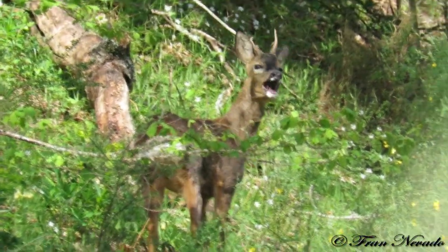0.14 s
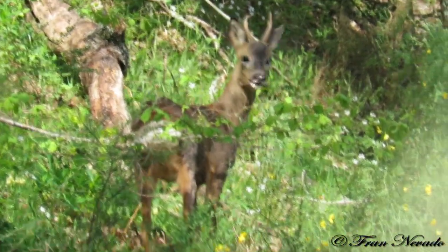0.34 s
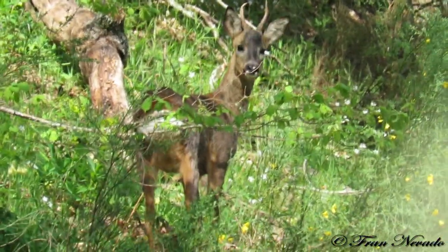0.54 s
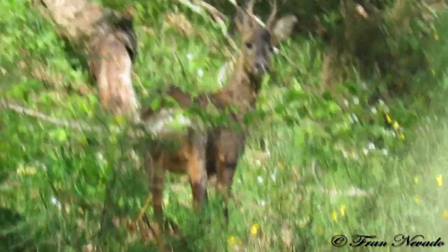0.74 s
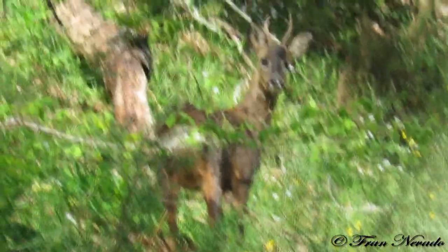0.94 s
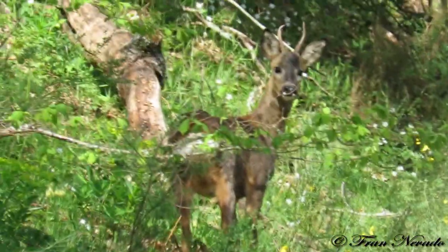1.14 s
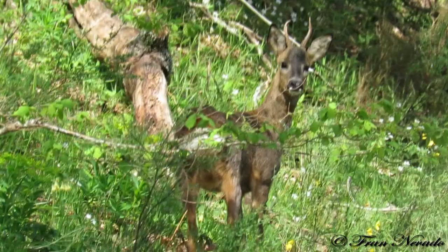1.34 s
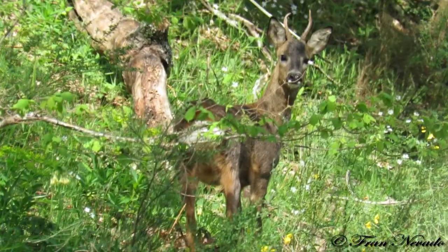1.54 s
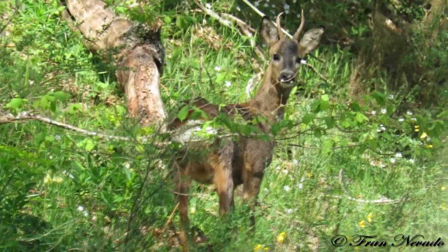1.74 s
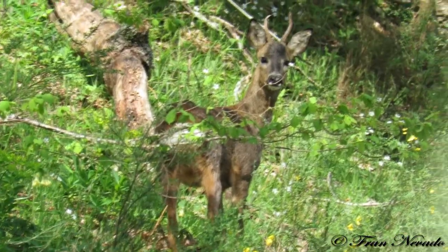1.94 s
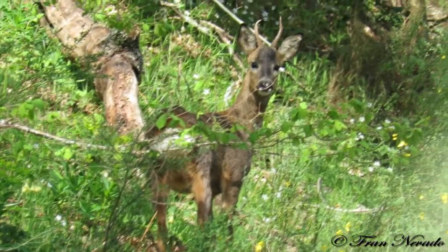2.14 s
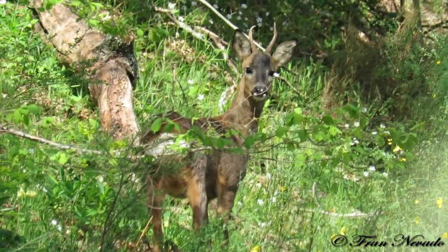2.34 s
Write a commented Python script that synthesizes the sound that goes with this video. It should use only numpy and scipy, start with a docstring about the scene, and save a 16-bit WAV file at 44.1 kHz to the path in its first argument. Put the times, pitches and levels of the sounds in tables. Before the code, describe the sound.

A small deer gives one harsh, hoarse bark in woodland, then faint birds whistle and buzz.

```python
"""Woodland: a small deer barks once, trees scatter the bark, and far birds whistle and buzz.
The bark is a source and filter: chaotic fold pulses and breath noise ring a throat that slowly lengthens.
Bird notes are gliding sines, some shaken in pitch; dry ticks are short bursts of treble noise.
Behind them lies a steady distant roar, maybe traffic or a stream, with faint microphone hiss in the treble:
both are one shaped noise, alike in the two channels at low pitch and unlike in the treble."""
import sys
import numpy as np
from scipy import signal
from scipy.fft import rfft, irfft, next_fast_len
from scipy.io import wavfile
from scipy.ndimage import uniform_filter1d, map_coordinates

SR = 44100
rng = np.random.default_rng(int(sys.argv[2]) if len(sys.argv) > 2 else 0)


def persist_wave(psi):
    """Save psi, clipped to +-1, as 16-bit WAV."""
    counts = np.round(np.clip(psi, -1, 1) * 32767).astype(np.int16)
    wavfile.write(sys.argv[1], SR, np.atleast_2d(counts).T)


N = 105840

SINK_START_S, SINK_END_S = 0.16, 0.51  # the throat lengthens between these times
FOLD_HZ, JITTER_CYCLES, PULSE_SCATTER_DB = 330, .4, 2.2  # mean pulse rate, spread of timing and of size
BREATH_SHARE = .5  # noise share of the source power
FIRM_SHARE = .65  # power share of a resonance heard as a tone at first; none once the throat has sunk
FIRM_SHAKE_HZ, FIRM_SHAKE_DB = 20, 2  # unsteadiness of those tones
RASP_DB = -21  # under the upper resonances
STEADY, STEADY_S = 0.62, 0.012  # how far the ringing is evened out (0 to 1), and over what time
BARK_ECHO_DB, BIRD_ECHO_DB = -12, -6
ECHO_CROSSFEED = 0.47  # amplitude of the other channel's echo added to each
BUZZ_HZ, SWELL, EDGE = 110, .27, .18  # rate of the buzz; shares of a note spent fading in and out
RISE_BEND, FALL_BEND = 1.7, 1.5  # powers that round a glide into and out of its turn
OFF_TURN_DB = 16  # a note is quieter away from its turn pitch, dB per octave
TICK_T60_S, TICK_HZ = .006, 6500  # decay time, high-pass corner
TOP_HZ = 14300  # band limit of the whole sound


def bark():
    """Source-filter voice: uneven fold pulses and breath noise excite the resonances of the throat."""
    # levels of the throat resonances and of the broad sound between them
    # columns: time_s, first_db, second_db, upper_db, broad_db
    levels = [(0.075, -35, -45, -54.5, -48.5), (0.091, -33, -45.5, -54, -39.5),
              (0.095, -25, -38, -57, -31.5), (0.101, -26.5, -35.5, -40, -36.5),
              (0.115, -26.5, -27.5, -29, -21), (0.137, -21, -16.5, -29, -26),
              (0.157, -19.5, -17.5, -21, -23), (0.203, -15.5, -16.5, -21, -28.5),
              (0.227, -29, -18.5, -25.5, -22.5), (0.255, -12, -20.5, -23, -20),
              (0.283, -22, -28.5, -23.5, -31.5), (0.301, -15, -15, -27, -26.5),
              (0.329, -16.5, -27.5, -30, -22.5), (0.347, -18.5, -14.5, -25, -37.5),
              (0.373, -13.5, -21, -28, -30.5), (0.401, -22, -21, -34, -22.5), (0.445, -22, -33, -36, -26),
              (0.478, -26.5, -39.5, -37.5, -29), (0.495, -33.5, -31, -48, -30.5),
              (0.535, -40, -41, -65, -38), (0.56, -38.5, -37, -52, -40)]
    # resonances, with levels relative within each table
    # columns: start_hz, end_hz, width_hz, level_db
    first_modes = [(746.7, 680.5, 53, 12.5), (640, 570, 150, -3)]
    second_modes = [(1289, 1280, 94, 5.5), (1133, 1200, 30, 2), (1412, 1400, 57, -7)]  # same columns
    upper_modes = [(1910, 1895, 120, 0), (2100, 2080, 150, -3), (2350, 2350, 150, -8),
                   (2520, 2590, 180, -6), (2780, 2770, 140, -6), (2930, 2900, 110, -7),
                   (3150, 3100, 220, -19)]  # same columns
    # firm tones within the first and second resonances; columns: time_s, first_hz, second_hz
    firm_pitches = [(.1, 700, 1290), (.14, 748, 1280), (.2, 765, 1305), (.26, 730, 1245), (.3, 725, 1335),
                    (.355, 705, 1260), (.47, 668, 1330)]
    # low voiced tone beneath the bark, gliding down from about 300 to 250 Hz
    # columns: time_s, pitch_hz, level_db
    low_tone = [(.1, 296, -40.5), (.22, 314.8, -41.5), (.35, 284.4, -40.5), (.47, 250.3, -47.5)]
    # relative spectrum of the broad sound; columns: frequency_hz, level_db
    broad_spectrum = [(150, -26.5), (290, -3), (420, -3), (600, -0.5), (930, 13), (1150, 6.5), (1600, 5),
                      (2600, -10), (3300, -43), (4500, -24.5), (8000, -88)]
    # relative spectrum of the rasp; columns: frequency_hz, level_db (per Hz)
    rasp_spectrum = [(2800, -37.5), (3300, 4.5), (3800, 3), (4200, -15), (4570, 1.5), (5000, -13),
                     (6000, -12), (7000, -11), (8000, -18.5), (9000, -26.5), (10500, -18.5), (12000, -33.5),
                     (13000, -26), (14200, -38)]

    count = int(N / SR * FOLD_HZ)
    at = (np.arange(count) + JITTER_CYCLES * rng.standard_normal(count)) * SR / FOLD_HZ
    sizes = amp(PULSE_SCATTER_DB * rng.standard_normal(count))
    pulses = np.bincount(np.clip(at, 0, N - 1).astype(int), sizes, N)
    folds = unit(pulses - pulses.mean())
    breath = rng.standard_normal(N)
    source = np.sqrt(1 - BREATH_SHARE) * folds + np.sqrt(BREATH_SHARE) * breath

    broad = unit(filtered(source, lambda f: amp(along(broad_spectrum, f))))
    rough = rng.standard_normal(N) + 0.67 * source
    rasp = amp(RASP_DB) * unit(filtered(rough, lambda f: amp(along(rasp_spectrum, f))))
    upper = throat(source, upper_modes) + rasp
    pitch_hz, low_db = curves(low_tone)
    low = amp(low_db) * tone(pitch_hz, shake_hz=6, shake_db=1.0)

    t = np.arange(N) / SR
    tonal = FIRM_SHARE * np.interp(t, [SINK_START_S, SINK_END_S], [1, 0])
    first, second = [np.sqrt(tonal) * tone(hz, FIRM_SHAKE_HZ, FIRM_SHAKE_DB)
                     + np.sqrt(1 - tonal) * throat(source, modes)
                     for hz, modes in zip(curves(firm_pitches), (first_modes, second_modes))]

    first_gain, second_gain, upper_gain, broad_gain = amp(curves(levels))
    begin, end = levels[0][0], levels[-1][0]
    on = np.interp(t, [begin - .02, begin, end, end + 0.095], [0, 1, 1, 0])
    voice = low + first_gain * first + second_gain * second
    return on * (voice + broad_gain * broad + upper_gain * upper)


def throat(source, modes, count=5):
    """Resonance of a lengthening tube: band-pass modes slide in pitch, their ringing partly evened out."""
    def ring(u):
        """Sum of resonators, alternating in sign, at share u of the slide."""
        def response(f):
            total = 0
            for k, (start_hz, end_hz, width_hz, db) in enumerate(sorted(modes)):
                centre_hz = start_hz + (end_hz - start_hz) * u
                resonator = 1j * f * width_hz / (centre_hz ** 2 - f * f + 1j * f * width_hz)
                total = total + (-1) ** k * amp(db) * resonator ** 2
            return total
        return filtered(source, response)

    # crossfade between fixed positions of the throat
    sink = np.interp(np.arange(N) / SR, [SINK_START_S, SINK_END_S], [0, count - 1])
    x = unit(sum(np.sqrt(np.clip(1 - abs(sink - k), 0, 1)) * ring(k / (count - 1)) for k in range(count)))
    power = abs(uniform_filter1d(x * x, int(STEADY_S * SR))) + 0.033
    return unit(x / power ** (STEADY / 2))


def tone(hz, shake_hz, shake_db):
    """Frequency and amplitude modulation: a sine of rms 1 that wanders at random in pitch and level."""
    phase = 2 * np.pi * np.cumsum(hz + shake_hz * wobble(120.25)) / SR
    return unit(amp(shake_db * wobble(90)) * np.sin(phase))


def trees(x):
    """Multiple scattering: a diffuse echo, unlike in the two channels, that decays by frequency."""
    # decay of the scattered sound; columns: frequency_hz, t60_s
    decay = [(500, 0.22), (2000, 0.35), (5000, 0.5), (7000, 0.54), (10000, 0.12)]
    hz, t, z = signal.stft(rng.standard_normal((2, SR)), SR, nperseg=256)
    tail = signal.istft(z * amp(-60 * t / along(decay, hz)[:, None]), SR, nperseg=256)[1]
    tail = tail + ECHO_CROSSFEED * tail[::-1]
    delayed = np.pad(x, (400, 0))  # samples before the first echo
    return signal.fftconvolve(delayed[None], tail / np.linalg.norm(tail[0]), axes=1)[:, :N]


def birds():
    """Frequency modulation: each note is a sine that glides to a turn and on; buzzy notes shake in pitch."""
    # bird notes; turn_share is the place of the turn as a share of the length, pan_db left over right
    # columns: start_s, length_s, start_hz, turn_hz, end_hz, turn_share, level_db, buzz_depth_hz, pan_db
    notes = [(0.01, 0.027, 6000, 5640, 4770, 0.27, -55, 1, 4),
             (0.028, 0.023, 7800, 7100, 6430, 0.63, -62, 1, -8),
             (0.085, .03, 6020, 5040, 4600, .5, -56.5, 0.74, 4),
             (0.46, 0.022, 5950, 5600, 5200, 0.35, -58, 1, 9),
             (0.599, .175, 2450, 3286, 2760, 0.33, -49.5, 1, 0.5),
             (0.741, .05, 3265, 3230, 3280, 0.55, -59, 1, 0),
             (0.6, 0.0194, 7700, 7230, 6700, 0.56, -66, 0.9, 5),
             (0.713, 0.059, 7100, 7140, 7260, 0.48, -68.5, 100, -4),
             (0.827, 0.049, 8700, 8800, 8550, 0.41, -69, 180, 14),
             (0.826, 0.1, 7000, 5130, 5060, 0.5, -57, 1, 6),
             (0.844, 0.037, 6900, 6720, 7170, 0.55, -65, 110, 3),
             (0.931, 0.015, 4370, 4270, 4060, .5, -58, 1, 5),
             (1.005, 0.06, 6900, 7100, 6850, 0.4, -63, 130, 2),
             (1.102, .06, 5070, 4790, 4520, 0.39, -56.5, 0.75, 7),
             (1.118, 0.165, 2450, 3284, 2750, 0.36, -48.5, 1, -2),
             (1.479, 0.115, 2480, 3160, 3060, 0.7, -46.5, 110, 3.5),
             (1.613, 0.078, 7350, 7030, 6500, 0.58, -55.5, 180, 5),
             (1.396, 0.078, 4700, 4730, 4600, 0.41, -65.5, 60, 4),
             (1.886, 0.023, 4050, 4160, 4160, .5, -60, 1, 0),
             (2.376, 0.014, 7960, 8550, 8200, 0.71, -63, 1, 6),
             (1.636, .042, 5000, 3800, 3100, 0.45, -53, 200, 0),
             (1.705, 0.037, 2720, 2720, 2620, 0.59, -49, 55, 8),
             (1.685, 0.056, 2600, 3000, 2960, .55, -39, 26, 3),
             (1.751, 0.119, 2860, 2890, 2830, 0.37, -51, 170, 0),
             (1.81, 0.023, 3480, 3480, 3470, .5, -58, 1, 0),
             (1.87, 0.04, 3060, 3156, 3050, 0.44, -56, 60, 2),
             (1.839, 0.064, 7420, 6920, 6950, 0.32, -62.5, 130, -1),
             (1.91, 0.056, 7200, 6980, 6600, 0.66, -68.5, 130, -2),
             (1.915, 0.05, 3030, 2904, 2720, 0.59, -49.5, 0.91, 1),
             (0.38, 0.024, 5930, 5750, 5000, 0.3, -60, 1, 5),
             (1.995, .045, 3200, 3950, 5000, 0.4, -53, 120, 0),
             (2.165, .057, 3200, 3800, 5050, .4, -52, 120, 2),
             (2.257, .03, 5900, 6450, 6550, .6, -67, 1, 4),
             (2.022, .143, 2300, 3060, 3060, 0.45, -42, 70, 4),
             (2.153, .05, 6700, 7400, 7400, 0.45, -68, 1.3, 5),
             (2.184, 0.0497, 2600, 2677, 2950, .3, -43.5, 60, 7),
             (2.222, 0.046, 2950, 2995, 2950, 0.6, -40, 40, 0),
             (0.52, 0.025, 6800, 7330, 7630, 0.6, -67, 40, 0),
             (2.275, 0.054, 7400, 7700, 7770, 0.47, -63.5, 1.2, -10),
             (2.28, 0.098, 2860, 2890, 2880, 0.42, -48.5, 180, 0),
             (2.33, 0.047, 5750, 5600, 5430, 0.35, -64, 1, -2),
             (2.364, 0.036, 3530, 4050, 4900, .4, -55, 60, 7)]
    out = np.zeros((2, N + SR))
    for s, length, start_hz, turn_hz, end_hz, turn, db, buzz_hz, pan_db in notes + twitter():
        u = np.linspace(0, 1, int(length * SR))
        turn = np.clip(turn, .1, .9)
        rise = turn_hz + (start_hz - turn_hz) * abs(1 - u / turn) ** RISE_BEND
        fall = turn_hz + (end_hz - turn_hz) * abs((u - turn) / (1 - turn)) ** FALL_BEND
        hz = np.where(u < turn, rise, fall)
        hz = hz + buzz_hz * np.sin(2 * np.pi * BUZZ_HZ * u * length) + 25 * wobble(250)[:len(u)]
        fade = np.sin(np.pi / 2 * np.clip(np.minimum(u / SWELL, (1 - u) / EDGE), 0, 1))
        level = np.sqrt(2) * amp(db - OFF_TURN_DB * abs(np.log2(hz / turn_hz)))
        note = level * fade * np.sin(2 * np.pi * np.cumsum(hz) / SR)
        out[:, round(s * SR):][:, :len(u)] += note * amp([[pan_db / 2], [-pan_db / 2]])
    out = out[:, :N] * amp(2.2 * wobble(70))  # the level flickers
    return out + amp(BIRD_ECHO_DB) * trees(out.mean(axis=0))


def twitter():
    """Random point process: rows of short faint sweeps of farther birds, in the columns of the notes."""
    # groups of sweeps; columns: rate_per_s, level_db, mean_hz, from_s
    groups = [(70, -66, 4100, 1.42), (22, -72, 7100, .4)]
    rows = []
    for per_s, db, mean_hz, from_s in groups:
        u, g = rng.random((90, 2)), rng.standard_normal((90, 4))
        starts = from_s + (np.arange(len(u)) + u[:, 0]) / per_s
        centres = mean_hz * np.exp(.12 * g[:, 0])
        for s, a, hz, (sweep, loud, pan) in zip(starts, u[:, 1], centres, g[:, 1:]):
            if s < N / SR:
                rows.append((s, 0.0095 + 0.0144 * a, hz * (1 - 0.066 * sweep), hz, hz * (1 + 0.051 * sweep),
                             .5, db + 2 * loud, 60, 2 * pan))
    return rows


def ticks():
    """Impulsive sound: noise bursts with exponential decay, high-passed to small dry clicks."""
    # ticks, with the noise level at their start, ahead of the high-pass; columns: start_s, level_db
    clicks = [(1.5944, -42), (2.38, -51.5)]
    out, t = np.zeros(N + SR), np.arange(SR // 20) / SR
    for s, db in clicks:
        out[round(s * SR):][:len(t)] += amp(db - 60 * t / TICK_T60_S) * rng.standard_normal(len(t))
    return filtered(out[:N], lambda f: (1j * f / (TICK_HZ + 1j * f)) ** 4)


def roar_and_hiss():
    """Partial coherence: a distant roar alike in both channels, and incoherent microphone hiss in the treble."""
    # relative spectrum of roar and hiss; columns: frequency_hz, level_db (per Hz)
    spectrum = [(15, -54), (35, -19), (70, -12.5), (178, -12.5), (308, -4.5), (400, -8.5), (470, -6),
                (680, -12), (950, -4.5), (1200, -7.5), (1400, -10.5), (1950, -18), (2400, -26), (3200, -32),
                (4000, -36.5), (5000, -41.5), (6300, -44), (8000, -47), (10000, -54), (13000, -56.5),
                (14300, -64)]
    # overall level; columns: time_s, level_db
    loudness = [(0.6, -32), (1.576, -34.5), (1.952, -32.5), (2.294, -34), (2.4, -33)]
    # correlation of left and right, near nothing in the hiss; columns: frequency_hz, likeness
    likeness = [(30, .92), (100, .85), (500, .88), (1000, .94), (1700, .92), (3400, .7), (5000, .3),
                (7000, .05), (14000, -.1)]
    # phase by which the left leads; columns: frequency_hz, lead_rad
    phase_leads = [(60, -0.35), (170, -0.41), (1000, -.5), (1700, -0.35), (3400, -0.53), (5000, .05)]
    # left over right; columns: frequency_hz, pan_db
    balance = [(170, 0.5), (500, -0.3), (1000, -1.5), (1700, -1.6), (3000, -0.5), (6000, .05)]

    # faint patches in time and frequency
    z = signal.stft(rng.standard_normal((2, N)), nperseg=512)[2]
    field = uniform_filter1d(uniform_filter1d(rng.standard_normal(z.shape[1:]), 6, 0), 14, 1)
    pair = signal.istft(z * amp(0.74 * unit(field)), nperseg=512)[1][:, :N]

    def mid_side(hz):
        """Spectra of the common and opposed parts that give the wanted correlation."""
        angle = np.arccos(np.clip(along(likeness, hz), -1, 1)) / 2
        return amp(along(spectrum, hz)) * np.array([np.cos(angle), np.sin(angle)])

    half = np.array([[.5], [-.5]])
    mid, side = filtered(pair, mid_side)
    wide = filtered(np.array([mid + side, mid - side]),
                    lambda hz: np.exp(1j * half * along(phase_leads, hz)) * amp(half * along(balance, hz)))
    return amp(curves(loudness)[0]) * unit(wide)


def placed(x, table):
    """Interchannel cues: a pair set apart in phase and level by (frequency_hz, lead_rad, pan_db) rows."""
    hz, lead, db = np.transpose(table)
    half = np.array([[.5], [-.5]])
    return filtered(x, lambda f: np.exp(1j * half * along(np.c_[hz, lead], f))
                    * amp(half * along(np.c_[hz, db], f)))


def amp(db):
    """Decibel law: amplitude ratio of a level."""
    return 10 ** (np.asarray(db) / 20)


def unit(x):
    """Normalisation to an rms of 1."""
    return x / np.sqrt(np.mean(x ** 2) + 1e-20)


def along(points, hz):
    """Linear interpolation of (frequency_hz, value) points on a log frequency axis."""
    f, v = np.transpose(points)
    return np.interp(np.log(hz + 1), np.log(f + 1), v)


def curves(rows):
    """Linear interpolation in time: one value per sample for each column after the time."""
    s, *cols = np.transpose(rows)
    return [np.interp(np.arange(N) / SR, s, c) for c in cols]


def wobble(rate):
    """Slow random modulation: a smooth curve through rate random knots a second."""
    return map_coordinates(rng.standard_normal(int(N * rate / SR) + 4), [np.arange(N) * rate / SR])


def filtered(x, response):
    """Linear filtering: the spectrum of x times a complex response of frequency."""
    m = next_fast_len(N + SR // 2)
    return irfft(rfft(x, m) * response(np.fft.rfftfreq(m, 1 / SR)), m)[..., :N]


def scene():
    """Superposition: the placed bark, its echo from the trees, birds, ticks, roar and hiss add up."""
    # direct bark, left relative to right; columns: frequency_hz, lead_rad, pan_db
    bark_side = [(500, -0.33, -1.4), (1113, 0.43, 1.2), (1700, -.1, 1.9), (2600, 0.22, 0), (4500, 0.066, 3),
                 (5500, .5, 1.5), (7000, -.2, -1.5), (8600, -.4, 0.5), (10000, .02, -1)]
    deer = bark()
    echo = amp(BARK_ECHO_DB) * trees(deer)
    return placed(deer, bark_side) + echo + birds() + ticks() + roar_and_hiss()


def record(dry):
    """Band limiting: an ideal low-pass keeps only what lies below TOP_HZ."""
    return filtered(dry, lambda hz: hz < TOP_HZ)


dry = scene()
out = record(dry)
persist_wave(out)
```